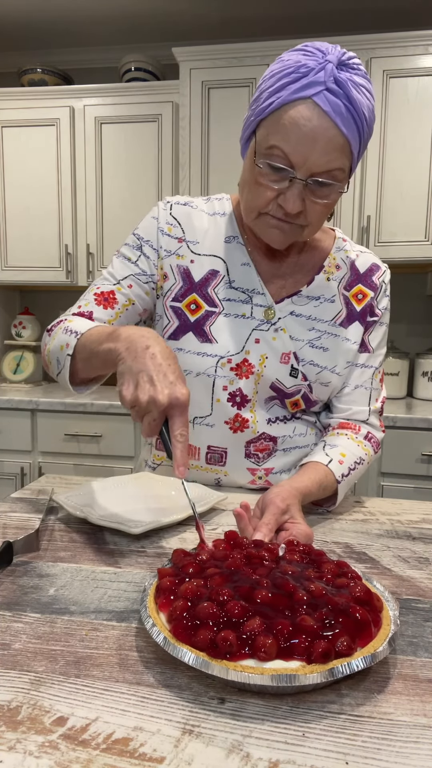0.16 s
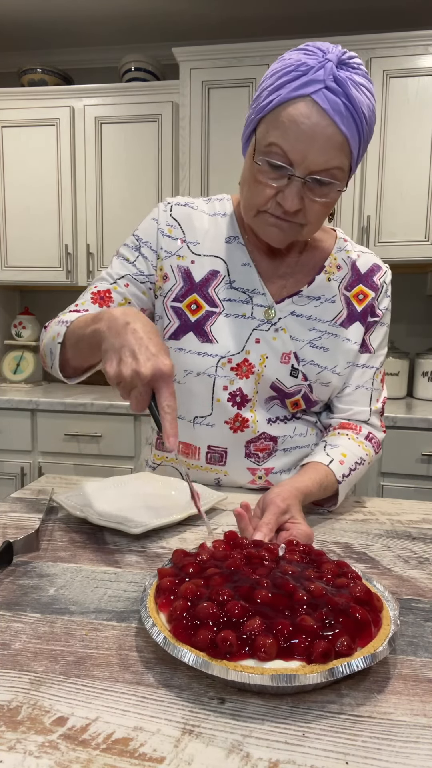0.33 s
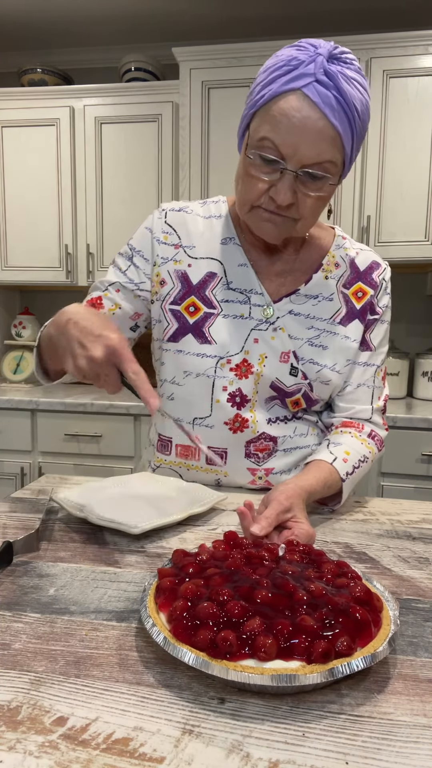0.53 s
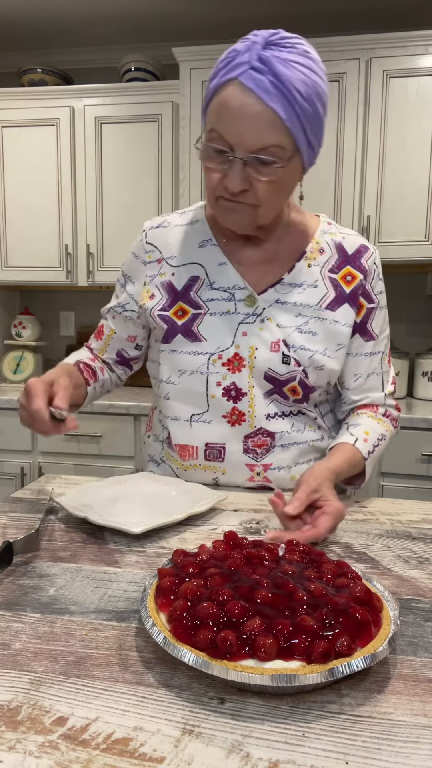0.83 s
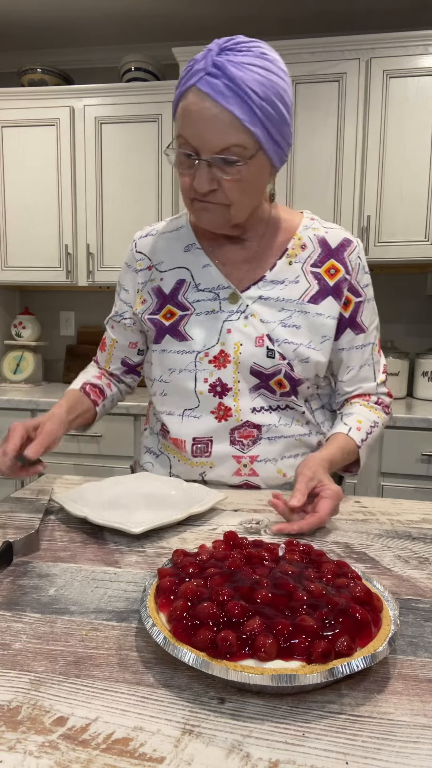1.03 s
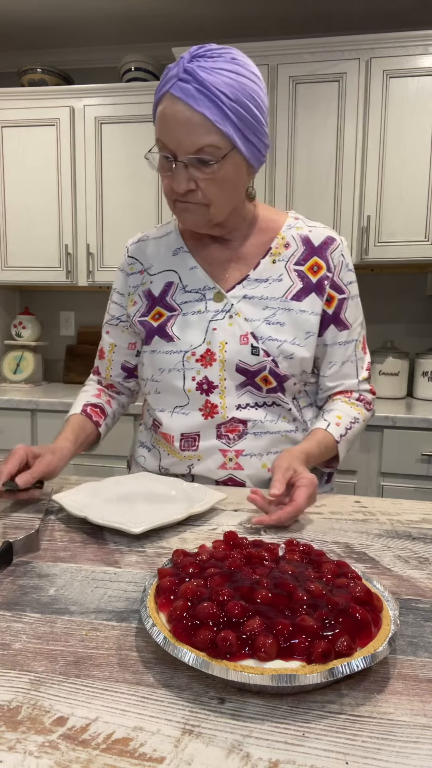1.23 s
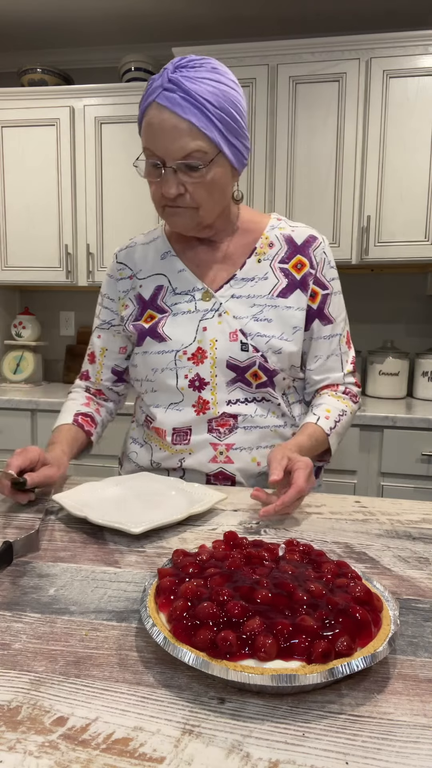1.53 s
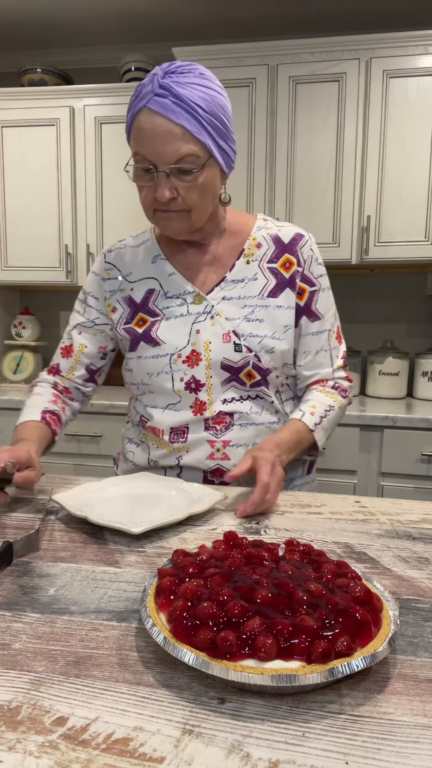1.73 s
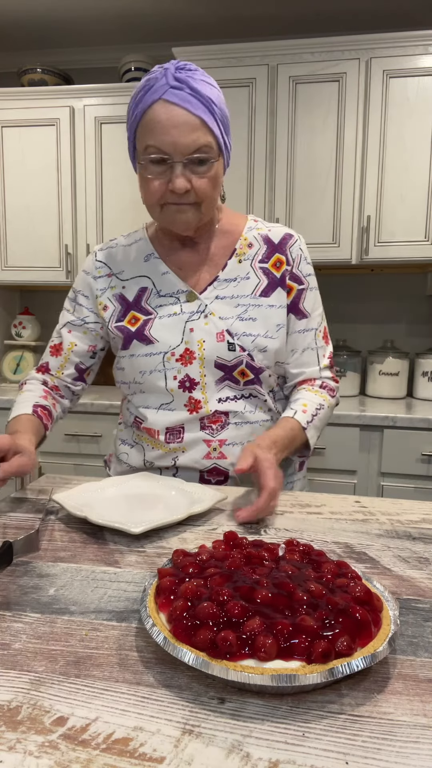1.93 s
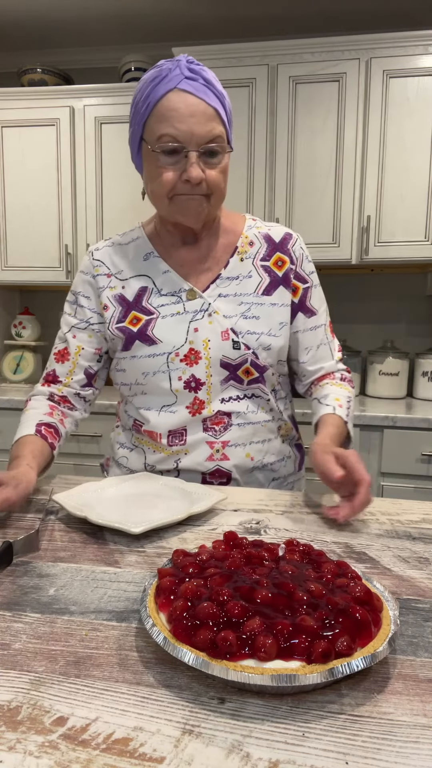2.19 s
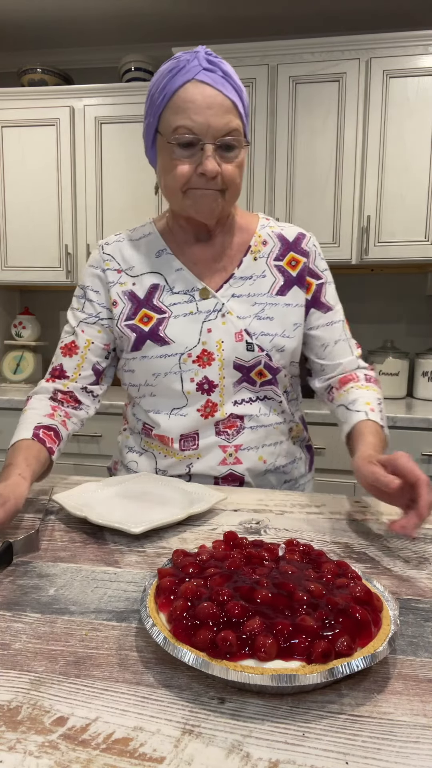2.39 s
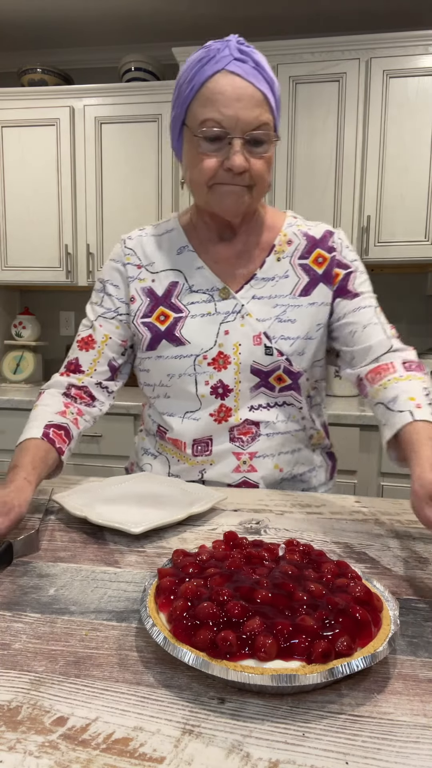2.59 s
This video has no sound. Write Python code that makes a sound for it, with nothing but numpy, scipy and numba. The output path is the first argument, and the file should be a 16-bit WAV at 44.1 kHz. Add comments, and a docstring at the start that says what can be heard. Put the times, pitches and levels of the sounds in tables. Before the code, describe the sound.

The loudest sound is a wooden kitchen drawer sliding and banging to a stop. It follows a knife ticking softly out of a pie, clinking and clattering lightly onto the counter, heard nearby over a faint hum.

```python
"""Pie knife and kitchen drawer.

A knife leaves a soft pie with faint sticky ticks, clinks and is laid on the counter.
A wooden drawer is then knocked into motion, rolls on its runners and bangs against its stop.
An appliance hums underneath; the hard room rings briefly after every knock."""
import sys
import numpy as np
from scipy import signal
from scipy.fft import rfft, irfft, next_fast_len
from scipy.io import wavfile
from numba import njit

SR = 44100
rng = np.random.default_rng(int(sys.argv[2]) if len(sys.argv) > 2 else 0)


def inscribe(sig):
    """Save sig as 16-bit PCM at rate SR to the path in sys.argv[1].

    A 1-D sig is mono; a 2-D sig holds one channel per row.
    Samples are clipped to [-1, 1] before scaling.
    """
    pcm = np.round(np.clip(np.atleast_2d(sig).T, -1, 1) * 32767)
    wavfile.write(sys.argv[1], SR, pcm.astype(np.int16))


N = 121275
T = np.arange(N) / SR


def amp(db):
    """Decibels to gain."""
    return 10 ** (np.asarray(db) / 20)


def unit(x):
    """Scale to rms 1."""
    return x / np.sqrt(np.mean(x ** 2))


def curve(points):
    """Linear envelope through (time [s], value) points."""
    return np.interp(T, *np.array(points).T)


def by_pitch(hz, points):
    """Read (frequency [Hz], value) points on a log axis."""
    points_hz, values = np.array(points).T
    return np.interp(np.log(hz + 1), np.log(points_hz), values)


def colour(x, spectrum):
    """Minimum-phase filter from (frequency [Hz], gain [dB]) points; output at rms 1."""
    n = 2 * next_fast_len(N)
    hz = np.arange(n // 2 + 1) * SR / n
    cepstrum = irfft(np.log(amp(by_pitch(hz, spectrum))))
    cepstrum[1:n // 2] *= 2
    cepstrum[n // 2 + 1:] = 0
    return unit(irfft(rfft(x, n) * np.exp(rfft(cepstrum)))[:N])


def cut(x, hz, kind, order=2):
    """Butterworth low-, high- or band-pass."""
    sos = signal.butter(order, np.minimum(hz, SR / 2 - 1000), kind, fs=SR, output="sos")
    return signal.sosfilt(sos, x + 1e-18)


def fade(t60_s):
    """Exponential decay."""
    return np.exp(-np.minimum(np.log(1000) * T / t60_s, 100))


def burst(t60_s):
    """Decaying white noise."""
    return rng.standard_normal(N) * fade(t60_s)


def swell(centre_s, sigma_s):
    """Gaussian envelope."""
    return np.exp(-((T - centre_s) / sigma_s) ** 2 / 2)


def place(x, start_s, energy_db=0):
    """Delay x and scale it so that rms 1 becomes a total energy of energy_db."""
    delayed = np.concatenate([np.zeros(int(start_s * SR)), x])[:N]
    return amp(energy_db) * delayed / np.sqrt(N)


def wander(rate_hz):
    """Random drift, spread near 1."""
    return np.interp(T * rate_hz, np.arange(1000), rng.standard_normal(1000))


@njit
def resonate(x, hz, width_hz):
    """State-variable band-pass with a per-sample centre frequency."""
    y, band_state, low_state = np.empty(len(x)), 0., 0.
    for i in range(len(x)):
        gain, damping = np.tan(np.pi * hz[i] / SR), width_hz / hz[i]
        band = (band_state + gain * (x[i] - low_state)) / (1 + gain * (gain + damping))
        band_state = 2 * band - band_state
        low_state += 2 * gain * band
        y[i] = damping * band
    return y


def strike(blows, modes, spectrum, ring_db, snap_db, crack_t60_s, chatter_t60_s=0):
    """Each blow gives a snap, a noisy crack and ringing modes; chatter keeps feeding the modes."""
    free_ring = sum((-1) ** k * amp(db) * np.sin(2 * np.pi * hz * T) * fade(t60_s)
                    for k, (hz, db, t60_s) in enumerate(modes))
    snap = colour(signal.unit_impulse(N), spectrum)
    hits = 0
    for start_s, energy_db, lowpass_hz in blows:
        ring = signal.fftconvolve(free_ring, burst(chatter_t60_s))[:N] if chatter_t60_s else free_ring
        crack = colour(burst(crack_t60_s), spectrum)
        hit = unit(amp(ring_db) * unit(ring) + amp(snap_db) * snap + crack)
        hits += place(cut(hit, lowpass_hz, "low"), start_s, energy_db)
    return hits


# Room decay (frequency [Hz], t60 [s])
ROOM_DECAY = [(120, 0.34), (500, 0.36), (1500, 0.42), (3000, 0.38), (6000, 0.37), (12000, 0.2)]

def kitchen(x, wet_db, gap_s=0.004, build_s=0.0029):
    """Direct sound plus a diffuse tail that dies soonest in the top treble."""
    octaves_hz = 60 * 2. ** np.arange(9)
    noise, bins_hz = rfft(rng.standard_normal(N)), np.fft.rfftfreq(N, 1 / SR)
    octave = np.abs(np.log((bins_hz[:, None] + 1) / octaves_hz)).argmin(axis=1)
    tail = sum(irfft(noise * (octave == k), N) * fade(by_pitch(hz, ROOM_DECAY))
               for k, hz in enumerate(octaves_hz))
    tail *= 1 - np.exp(-T / build_s)
    return x + signal.fftconvolve(x, place(unit(tail), gap_s, wet_db))[:N]


# Air spectrum (frequency [Hz], relative level [dB])
AIR_SPECTRUM = [(20, -17), (40, -17), (60, 8.5), (110, -0.5), (300, -4), (550, -7.5), (1000, -16),
                (2000, -22), (3700, -21.5), (7000, -27.5), (15000, -31.5)]

def room_air(level_db=-60):
    """Still air: steady, bass-heavy noise."""
    return amp(level_db) * colour(rng.standard_normal(N), AIR_SPECTRUM)


# Steady hum lines (frequency [Hz], level [dB])
HUM_LINES = [(59.3, -63), (89.5, -74), (145, -72), (296, -72.5), (414.6, -75.5), (710.6, -80), (1127, -80)]
# Whine envelope (time [s], level [dB])
WHINE_LEVEL = [(0, -66), (.15, -63), (1.05, -63), (1.35, -75.5), (1.75, -66.5), (1.95, -66), (2.75, -94)]

def appliance(whine_hz=354.3, waver_db=1, drift_rad=0.092):
    """Wavering hum, with a whine that dips, returns and dies away."""
    def tone(hz):
        phase = 2 * np.pi * (hz * T + rng.random()) + drift_rad * wander(3.2)
        return np.sqrt(2) * np.sin(phase) * amp(waver_db * wander(4.8))

    hum = sum(amp(db) * tone(hz) for hz, db in HUM_LINES)
    return hum + amp(curve(WHINE_LEVEL)) * tone(whine_hz)


def crust(level_db=-70, grains_per_s=350, scatter_db=4):
    """Crumbs give way under the blade in a fine crackle."""
    grains = (rng.random(N) < grains_per_s / SR) * rng.choice([-1, 1], N)
    crackle = cut(grains * amp(scatter_db * rng.standard_normal(N)), 3500, "high")
    return amp(level_db) * unit(crackle) * swell(centre_s=0.10, sigma_s=0.049)


# Sticky ticks (time [s], energy [dB], high-pass [Hz])
PIE_TICKS = [(.064, -37, 2400), (0.165, -33, 9800), (.234, -44, 2500)]

def pie_ticks(t60_s=0.022):
    """Blade, filling and foil tick as the knife comes out."""
    return sum(place(unit(cut(burst(t60_s), hz, "high")), start_s, db) for start_s, db, hz in PIE_TICKS)


# Friction swells (centre [s], sigma [s], level [dB])
RUB_SWELLS = [(0.082, 0.067, -65.5), (0.436, 0.011, -60.5), (0.542, 0.035, -61.5), (0.85, 0.13, -67),
              (1.026, 0.016, -56), (1.102, 0.058, -58.5), (1.196, 0.054, -55), (1.686, 0.038, -68),
              (2.72, 0.052, -60.5)]
# Friction spectrum (frequency [Hz], relative level [dB])
RUB_SPECTRUM = [(60, 7), (400, -43), (750, -5), (1200, 8), (2200, 3), (3500, -0.5), (7000, -8.5),
                (11000, -11), (15000, -24)]

def rubs(grain_db=2):
    """Light, grainy friction of blade, hand and sleeve."""
    envelope = sum(amp(db) * swell(centre_s, sigma_s) for centre_s, sigma_s, db in RUB_SWELLS)
    friction = rng.standard_normal(N) * amp(grain_db * wander(250))
    return envelope * colour(friction, RUB_SPECTRUM)


def hand_thud(hz=148, t60_s=0.28):
    """The hand lands softly on the counter with the knife."""
    thud = cut(np.sin(2 * np.pi * hz * T) * fade(t60_s), 190, "low", order=4)
    return place(unit(thud), start_s=1.017, energy_db=-21.5)


# Blade clinks; counter contacts (time [s], energy [dB], low-pass [Hz])
BLADE_BLOWS = [(.4445, -11, 15300), (.452, -23.5, 7000), (.530, -29, 4500)]
COUNTER_BLOWS = [(1.022, -27.5, 14000), (1.1315, -13.5, 15500), (1.138, -18.5, 16000),
                 (1.146, -16.5, 15000), (1.161, -25, 10600), (1.178, -30, 11000), (1.210, -23.5, 6500)]
# Knife modes, held and on the counter (frequency [Hz], relative level [dB], t60 [s])
BLADE_MODES = [(2090, -4, 0.06), (2200, -1, 0.082), (3200, -9.5, 0.14), (3330, -6, 0.04), (6345, -6, 0.057),
               (7000, 2.5, .016), (12200, -10, .03), (14250, -9, .025)]
COUNTER_MODES = [(1210, -1, 0.028), (2080, 8.5, 0.032), (3000, -10, 0.036), (4800, -4, 0.04),
                 (5880, 4, 0.03), (6060, 2, .022), (7000, 5, 0.02), (8200, 0.5, 0.029), (9630, 2.5, 0.038),
                 (10700, 2.5, 0.019), (12200, -3, .025), (14300, 0, .012)]
# Contact noise (frequency [Hz], relative level [dB])
BLADE_SPECTRUM = [(200, -26), (800, -15.5), (1900, 2.5), (3300, 2), (4300, -5), (7000, -2), (10000, -10.5),
                  (15000, -3.5)]
COUNTER_SPECTRUM = [(200, -36), (700, -24), (1200, -4.5), (2200, 1), (4000, 4.5), (8000, -2), (11500, -15),
                    (15000, -2)]

def knife():
    """The blade leaves the pie, clinks, then clatters lightly onto the counter."""
    clink = strike(BLADE_BLOWS, BLADE_MODES, BLADE_SPECTRUM, ring_db=0, snap_db=-5.5, crack_t60_s=0.047)
    clatter = strike(COUNTER_BLOWS, COUNTER_MODES, COUNTER_SPECTRUM,
                     ring_db=3, snap_db=-10, crack_t60_s=0.07, chatter_t60_s=0.029)
    lifted = kitchen(clink + pie_ticks() + crust(), wet_db=-6)
    laid = kitchen(clatter + rubs() + hand_thud(), wet_db=-5.5)
    return lifted + laid


# Roll envelope (time [s], gain [dB])
ROLL_GAIN = [(2.066, -45), (2.085, -37), (2.14, -34), (2.163, -30), (2.20, -29.5), (2.23, -35.5),
             (2.265, -32.5), (2.31, -37.5), (2.37, -38), (2.45, -51)]
# Box resonance (time [s], frequency [Hz])
BOX_PITCH = [(2.09, 587), (2.21, 533), (2.29, 655)]
# Runner rasp (frequency [Hz], relative level [dB])
RUNNER_SPECTRUM = [(50, -18.5), (170, 0), (420, 6), (800, 3), (1700, -3), (2400, -9), (3000, -13.5),
                   (3700, -22.5), (6000, -28.5), (15000, -51)]
# Panel resonances (frequency [Hz], width [Hz], gain when fast [dB], gain when slow [dB])
PANEL_MODES = [(185, 26, -10, -4), (685, 32, -8, -3), (800, 36, -1, 7), (970, 23, -3, -12),
               (1076, 33, 1, 1.5), (1217, 35, 5.5, -10), (1626, 67, 1.5, -13), (2030, 206, -4, -12)]

def drawer_roll(start_s, stop_s, slows_s=2.26, slowing_s=0.12, judder_db=2,
                box_db=-1, panels_db=-3.5, rasp_db=-4, scrape_db=-47.5):
    """Juddering runners shake box and panels and scrape a dry patch; on slowing, the rasp dulls."""
    judder = amp(judder_db * wander(130))
    slow = np.clip((T - slows_s) / slowing_s, 0, 1)

    def bumps():
        return rng.standard_normal(N) * judder

    def shaken(hz, width_hz):
        return resonate(bumps(), hz * np.ones(N), float(width_hz))

    box = shaken(curve(BOX_PITCH), width_hz=100)
    box = amp(box_db) * unit(cut(box, [250, 1200], "band"))
    panels = sum(amp(fast_db + slow * (slow_db - fast_db)) * shaken(hz, width_hz)
                 for hz, width_hz, fast_db, slow_db in PANEL_MODES)
    panels = amp(panels_db) * unit(cut(panels, 3500, "low", order=6))
    rasp = amp(rasp_db) * colour(bumps(), RUNNER_SPECTRUM)
    dull_rasp = amp(-5) * cut(rasp, 4400, "low", order=1)
    roll = panels + (1 - slow) * (box + rasp) + slow * dull_rasp
    scrape = unit(cut(shaken(2780, width_hz=230), 2850, "low", order=6))
    scrape *= amp(scrape_db) * swell(centre_s=2.24, sigma_s=0.037)
    moving = (T > start_s) & (T < stop_s)
    return moving * (amp(curve(ROLL_GAIN)) * roll + scrape)


def through_wood(x, dispersion=1.19, knee_hz=60):
    """Bending waves carry treble fastest, so the bass of a knock arrives late."""
    n = 2 * next_fast_len(N)
    lag_cycles = dispersion * np.log1p(np.fft.rfftfreq(n, 1 / SR) / knee_hz)
    return irfft(rfft(x, n) * np.exp(-2j * np.pi * lag_cycles))[:N]


def contents_sizzle(start_s, energy_db=-25, t60_s=0.18):
    """The bang leaves a brief, very high sizzle among the drawer's contents."""
    return place(unit(cut(burst(t60_s), 13000, "high", order=6)), start_s, energy_db)


# Nudge with its quick echo off the cabinet front about 4 ms later, a further nudge and a late runner bump; stop
# with its 4 ms echo and a rebound; shifting contents (time [s], energy [dB], low-pass [Hz])
NUDGE_BLOWS = [(2.0660, 8.5, 6150), (2.0699, 1, 2200), (2.081, -1, 2900), (2.368, -15.5, 4700)]
STOP_BLOWS = [(2.4554, 9.5, 8760), (2.4592, 7, 7000), (2.462, 1.5, 2970), (2.494, 2, 3350)]
RATTLE_BLOWS = [(2.4675, -4, 8900), (2.4712, 5, 5330), (2.4765, -11, 9000), (2.533, -10.5, 3900)]
# Struck modes (frequency [Hz], relative level [dB], t60 [s])
DRAWER_MODES = [(175, -11, 0.19), (274, -8.5, 0.1), (492.4, 4.5, 0.06), (567, -2.5, 0.1), (739, -12, 0.13),
                (978, 3, 0.046), (1266, -3, 0.075), (1477, 5, 0.033), (1980, 4.5, 0.022), (2990, -1, 0.018)]
CABINET_MODES = [(164.6, 2.5, 0.36), (276, -1.5, .15), (424.5, 5.5, 0.13), (629, 7, 0.11),
                 (820, 5.5, 0.044), (1011, 8, 0.072), (1292, 3, 0.26), (1685, -14, 0.037),
                 (1930, 21.5, 0.02), (2050, 14, 0.036)]
CONTENTS_MODES = [(1650, -15, 0.37), (1910, -20, 0.46), (2360, -11, 0.49), (2416, 5, 0.03),
                  (2840, -17, 0.03), (3270, 4.5, 0.019), (4710, -5, 0.025)]
# Contact noise (frequency [Hz], relative level [dB])
DRAWER_SPECTRUM = [(40, -40), (150, 5), (450, -1.5), (1000, -4), (2100, -3), (3300, -10), (4200, -20.5),
                   (8000, -29.5), (15000, -29)]
CABINET_SPECTRUM = [(40, -24), (130, 4.5), (220, -2.5), (700, 4.5), (2200, 0), (3500, -9), (5000, -13),
                    (7500, -22), (10000, -23.5), (15000, -43)]

def drawer():
    """A knock, a short roll, then a bang that shakes the contents."""
    start_s, stop_s = NUDGE_BLOWS[0][0], STOP_BLOWS[0][0]
    nudge = strike(NUDGE_BLOWS, DRAWER_MODES, DRAWER_SPECTRUM, ring_db=4, snap_db=1, crack_t60_s=0.026)
    bang = strike(STOP_BLOWS, CABINET_MODES, CABINET_SPECTRUM,
                  ring_db=-3.5, snap_db=-5, crack_t60_s=0.033)
    rattle = strike(RATTLE_BLOWS, CONTENTS_MODES, CABINET_SPECTRUM,
                    ring_db=-3, snap_db=0, crack_t60_s=0.049)
    travel = kitchen(through_wood(nudge) + drawer_roll(start_s, stop_s), wet_db=-6.5)
    arrival = kitchen(through_wood(bang) + rattle + contents_sizzle(stop_s), wet_db=-7.5)
    return travel + arrival


def scene():
    """Knife, drawer and background in mono."""
    return (knife() + drawer() + appliance() + room_air())[None]


def record(dry, ceiling=0.55, top_hz=15800):
    """Soft peak saturation, then a steep low-pass."""
    lowpass = signal.ellip(10, 0.2, 70, top_hz, fs=SR, output="sos")
    return signal.sosfilt(lowpass, ceiling * np.tanh(dry / ceiling))


dry = scene()
out = record(dry)
inscribe(out)
```